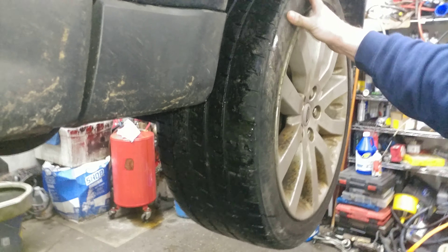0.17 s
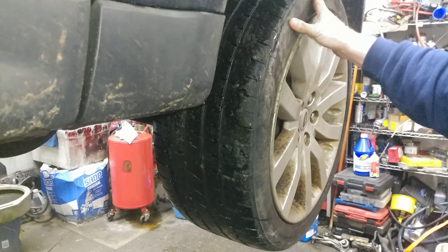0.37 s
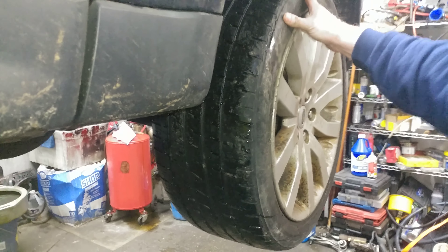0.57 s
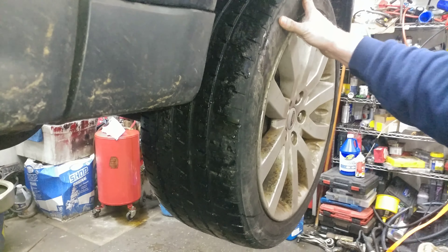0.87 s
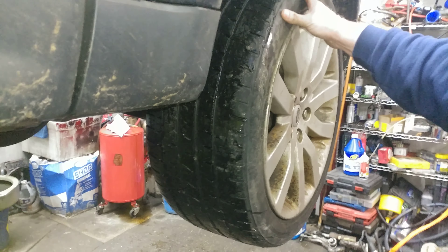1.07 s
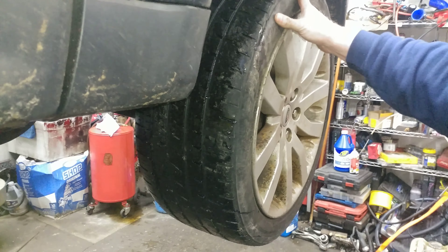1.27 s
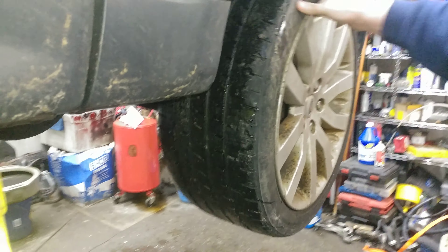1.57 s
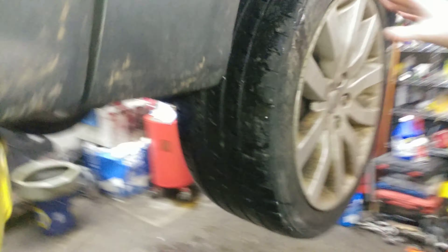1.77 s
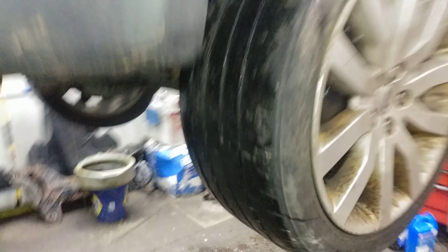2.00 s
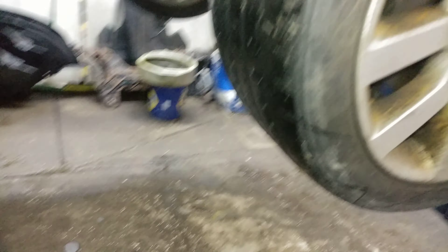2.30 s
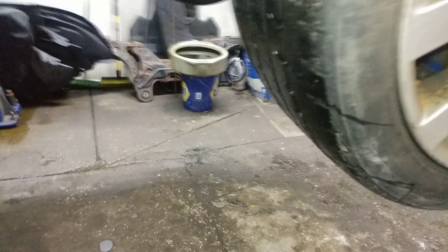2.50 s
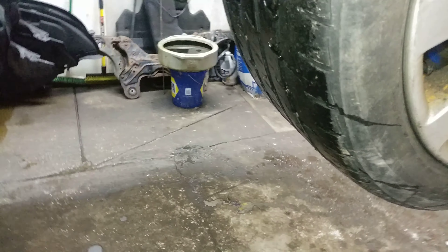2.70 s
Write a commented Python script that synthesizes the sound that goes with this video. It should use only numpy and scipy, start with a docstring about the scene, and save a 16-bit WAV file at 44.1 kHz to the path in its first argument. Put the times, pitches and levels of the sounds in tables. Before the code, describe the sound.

A loose car wheel is rocked by hand four times in a workshop, giving metallic knocks, dull tyre thuds and brief scrapes over a low rumble. Afterwards a few clicks and soft bumps sound close to the microphone.

```python
"""A workshop, with a stereo microphone facing a raised car wheel a little to the right. The wheel is
rocked by hand four times. Each push takes up the play in the hub: light contacts, then a hard knock,
all ringing the same metal. Each pull back thuds through the tyre and scrapes the loose joint, and the
car body rumbles along. Afterwards a few small clicks and bumps sound close to the microphone."""
import sys
import numpy as np
from scipy import signal
from scipy.fft import rfft, irfft, next_fast_len
from scipy.io import wavfile
from scipy.ndimage import uniform_filter1d

SR = 44100
rng = np.random.default_rng(int(sys.argv[2]) if len(sys.argv) > 2 else 0)


def dump_mix(stems):
    """Bounce the given channels to the path in sys.argv[1] as a 16-bit WAV at rate SR."""
    frames = np.atleast_2d(stems).T  # one column per channel
    limited = np.clip(frames, -1, 1)  # hard clip at full scale
    pcm = np.round(limited * 32767).astype(np.int16)
    wavfile.write(sys.argv[1], SR, pcm)


N = 125685

# Blows at the wheel: start_s, gain_db, dull_above_hz
HARD_KNOCKS = [(.1312, 1.5, 6880), (.5517, 0, 5000), (.9787, -0.5, 4460), (1.3954, 1.5, 5020),
               (1.612, -2.5, 2070)]  # at the end of the play
LIGHT_TAPS = [(0.0852, -10, 4000), (0.1017, 0.5, 2500), (0.306, -10, 12200), (.502, -10, 5070),
              (0.519, -8.5, 900), (0.694, -12, 8000), (.717, -5.5, 4000), (0.7334, -1, 1507),
              (.8125, -14.5, 1190), (0.932, -11, 3000), (0.944, -2.5, 1567), (1.123, -21.5, 12000),
              (1.143, -9.5, 3000), (1.345, -10.5, 2000), (1.362, -3.5, 2500), (1.585, -14, 8000),
              (1.602, -5, 8100)]  # as the play is taken up
TYRE_THUDS = [(.314, -1, 1200), (.324, -4, 700), (.336, 1, 400), (.732, -16.5, 1500), (.742, 1.5, 800),
              (.753, -6, 500), (1.162, 3.5, 1500), (1.185, -29.5, 400), (1.612, 0.5, 1200)]  # as the wheel swings back
# Modes of rim and suspension: pitch_hz, knock_db, tap_db, t60_s
HUB_MODES = [(152, -21.5, -32, 0.42), (197.1, -28, -26.5, .3), (233.2, -19, -32.5, .12),
             (323, -13.5, -32, 0.21), (487, -16, -26, .22), (559.8, -26, -17.5, 0.26),
             (622, -8, -14.5, 0.074), (855, -37, -32, .06), (1080, -26, -34, 0.75),
             (1117.6, -24, -19.5, .06), (1262, -21.5, -38.5, .06), (1625, -23.5, -35.5, .25),
             (1679, -17.5, -35.5, 0.12), (1810, -10, -34, .055), (1960, -17, -40, .04),
             (2140, -27, -30.5, 0.18), (3110, -27, -34, .06), (3307, -28, -49, .25)]
# Modes of the tyre and its air cavity: pitch_hz, level_db, t60_s
TYRE_MODES = [(68, -32.5, 1), (124, -24, .4), (186, -26.5, 0.93), (215.4, -15, .2), (366.2, -19, 0.084),
              (491, -21, 0.19), (546.6, -26, 0.45), (637, -35.5, 0.078)]
# Dry slips of the joint, then faint brushes: start_s, length_s, level_db, tilt_db_per_octave, pitch_hz
JOINT_SCRAPES = [(0.354, 0.032, -24, 1.5, 1640), (0.718, 0.0046, -31, -0.5, 2825),
                 (0.805, .012, -40, 9, 12600), (1.148, 0.0075, -21.5, -3, 2970),
                 (1.218, 0.017, -27.5, -2.5, 1700), (1.427, .16, -43, 2.5, 14200),
                 (1.597, 0.016, -17.5, -1.5, 5640), (1.644, 0.027, -25, -1, 768),
                 (1.684, 0.0095, -24, 1.5, 1756), (2.373, 0.0045, -58, 7, 8700),
                 (2.607, 0.022, -59.5, 3.5, 8500), (2.795, .04, -46, 5.5, 8700)]
# Sharp clicks at the microphone: start_s, gain_db, left_over_right_db, top_hz, woody_body_db
CLOSE_CLICKS = [(1.9434, -1, 7, 15240, -54), (2.187, -46, 8, 10000, -55), (2.5748, -5.5, -3, 7850, -40)]
# Soft handling bumps: start_s, gain_db, left_over_right_db, rise_s, pitch_hz
CLOSE_BUMPS = [(2.377, -8.5, -12, 0.0033, 934), (2.4981, 3, 4.5, 0.0003, 496),
               (2.7185, -15, -7, .0005, 339), (2.79, -15, -13.5, 0.0004, 458),
               (2.81, -17, -10.5, 0.015, 204)]
# Rumble of the rocking car body: time_s, level_db
RUMBLE_LEVELS = [(0, -33), (.1, -39), (0.349, -30.5), (1.7, -32.5), (1.83, -35), (1.93, -52),
                 (2.052, -60.5)]

# Tone colours of the noisy parts: frequency_hz, gain_db
KNOCK_CRACK_COLOUR = [(60, -32), (200, -15), (330, 27.5), (420, -15.5), (630, 17), (800, -15), (1150, 23),
                      (1400, -16), (1820, -9), (2400, -16), (3300, 12.5), (3800, -67.5), (6800, -80.5),
                      (8200, -38.5), (10500, -55), (16000, -74)]
KNOCK_RATTLE_COLOUR = [(30, -43.5), (65, -9.5), (250, -2), (500, -2.5), (850, -5), (1800, -5), (2350, -9),
                       (3300, -5), (3800, -26), (5500, -29.5), (7000, -48), (8500, -28.5), (10500, -73.5),
                       (16000, -84)]
TAP_COLOUR = [(60, -1.5), (250, 5.5), (600, 0.5), (850, -9.5), (1200, -2.5), (1800, -7.5), (2400, -11.5),
              (3300, -14.5), (3900, -33.5), (6500, -34.5), (8700, -27.5), (11000, -60), (16000, -47)]
THUMP_COLOUR = [(30, -20), (70, -15), (220, 13.5), (300, -9.5), (600, 2), (800, -2.5), (1150, -7.5),
                (2000, -27.5), (4000, -21.5), (10000, -68.5)]
RASP_COLOUR = [(100, -11.5), (500, 2.5), (1600, -1.5), (2100, -5), (3100, -1.5), (4200, -12.5),
               (5500, -14.5), (7000, -19), (8800, -15), (10800, -54.5), (13000, -35), (16000, -42)]
CLICK_COLOUR = [(100, -33), (600, -3.5), (2500, -10.5), (3700, -1), (5300, -8.5), (7000, -5.5), (8700, 10),
                (11200, -13), (12500, -8), (16000, -8.5)]
WOODY_COLOUR = [(100, -15), (600, 1), (1250, -13.5), (1900, -5), (3000, -17.5), (8000, -23.5),
                (16000, -45.5)]
BUMP_COLOUR = [(40, 10), (150, -1.5), (450, 6), (800, 1), (1200, -14.5), (2500, -27), (5000, -30),
               (7000, -36), (8700, -32.5), (11000, -62), (16000, -43)]
RUMBLE_COLOUR = [(20, -50), (30, -32), (42, 3), (65, -1.5), (130, -0.5), (165, -12.5), (192, 7.5),
                 (230, -17), (500, -20.5), (1500, -26.5), (3200, -38.5), (4500, -52.5), (16000, -60)]
ROOM_TONE_COLOUR = [(20, -31.5), (40, 0), (65, 8.5), (110, -1), (145, -2.5), (270, -18.5), (540, -15),
                    (1500, -27), (2800, -26.5), (6700, -34.5), (9000, -33), (11000, -52.5), (16000, -40)]

# Ring-out of car and workshop: frequency_hz, t60_s
SHOP_DECAY = [(100, 0.75), (260, 0.29), (700, 0.33), (1800, .33), (3200, 0.27), (5000, 0.27), (12000, 0.18)]
# Likeness of left and right for near and far sound: frequency_hz, correlation
NEAR = [(100, .95), (600, 0.71), (1200, 0.34), (2500, -0.032), (8000, -.1)]
FAR = [(60, 0.93), (250, 0.92), (550, 0.35), (1100, 0.37), (2500, -0.11), (8000, -0.1)]

RING_TIME = np.arange(int(0.8 * SR)) / SR  # seconds since a blow


def hub():
    """Every contact rings the same metal, so the knocks are near twins; light contacts sound hollow."""
    out = np.zeros((2, N))
    crack = spread(burst(decay(t60_s=0.024, hold_s=0.008), smooth_bins=24), NEAR)
    rattle = ring_out()
    knock = metal_ring([(hz, db, t60_s) for hz, db, _, t60_s in HUB_MODES])
    knock = knock + at_level(shaped(crack, KNOCK_CRACK_COLOUR), db=-14.5, samples=440)
    knock += at_level(shaped(rattle, KNOCK_RATTLE_COLOUR), db=-19.5, samples=2200)
    tap = metal_ring([(hz, db, t60_s) for hz, _, db, t60_s in HUB_MODES])
    tap = tap + at_level(shaped(crack, TAP_COLOUR), db=-22.5, samples=440)
    tap += at_level(shaped(rattle, TAP_COLOUR), db=-24, samples=2200)
    for sound, contacts in (knock, HARD_KNOCKS), (tap, LIGHT_TAPS):
        for start_s, gain_db, dull_above_hz in contacts:
            add(out, start_s, amp(gain_db) * dulled(sound, dull_above_hz))
    return out


def metal_ring(modes, longest_t60_s=0.3, after_db=-19.5, after_t60_s=0.36):
    """Struck metal rings briefly, with a faint lasting ring of the same modes."""
    brief = ringing([(hz, db, min(t60_s, longest_t60_s)) for hz, db, t60_s in modes])
    lasting = ringing([(hz, db + after_db, after_t60_s) for hz, db, _ in modes])
    return brief + lasting


def tyre():
    """The return blows are cushioned and set the tyre humming."""
    out = np.zeros((2, N))
    hum = ringing(TYRE_MODES)
    for start_s, gain_db, dull_above_hz in TYRE_THUDS:
        noise = spread(burst(decay(t60_s=0.2), smooth_bins=30), NEAR)
        thump = at_level(shaped(noise, THUMP_COLOUR), db=-19, samples=1300)
        add(out, start_s, amp(gain_db) * dulled(hum + thump, dull_above_hz))
    return out


def joint_scrapes(slips_per_s=1500, resonance_db=11.5, relative_width=0.026):
    """Runs of tiny slips rasp, each on its own resonance, and fade in the room."""
    out, t = np.zeros((2, N)), RING_TIME
    for start_s, length_s, level_db, tilt, pitch_hz in JOINT_SCRAPES:
        slips = (rng.random(len(t)) < slips_per_s / SR) * rng.standard_normal(len(t))
        stroke = slips * np.minimum(t / (length_s / 2), 1) * decay(t60_s=0.054, hold_s=length_s)
        direct = spread(burst(decay(t60_s=0.0092), smooth_bins=80), FAR)
        one_slip = direct + amp(-3) * ring_out()
        rasp = signal.fftconvolve(stroke[None], one_slip, axes=1)[:, :len(t)]
        peak_db = lambda f: resonance_db / (1 + ((f / pitch_hz - 1) / relative_width) ** 2)
        slope_db = lambda f: tilt * np.log2((f + 200) / 3000)
        rasp = coloured(rasp, lambda f: amp(along(RASP_COLOUR, f) + peak_db(f) + slope_db(f)))
        add(out, start_s, at_level(rasp, level_db, samples=int((length_s + 0.032) * SR)))
    return out


def close_clicks(base_db=8, room_db=-25):
    """Sharp clicks with a woody body, so near the microphone that they carry little room."""
    out = np.zeros((2, N))
    for start_s, gain_db, pan_db, top_hz, body_db in CLOSE_CLICKS:
        snap = burst(decay(t60_s=0.0052), smooth_bins=200)
        click = spread(snap, likeness=[(500, 0.36), (8000, 0.19)]) + amp(room_db) * ring_out()
        click = coloured(click, lambda f: amp(along(CLICK_COLOUR, f)) / np.sqrt(1 + (f / top_hz) ** 10))
        noise = spread(burst(decay(t60_s=0.035), smooth_bins=60), NEAR)
        body = at_level(shaped(noise, WOODY_COLOUR), body_db, samples=1300)
        add(out, start_s, amp(base_db + gain_db) * (click + body), pan_db)
    return out


def handling_bumps(base_db=-27.5, colour_pitch_hz=480):
    """Soft bumps close to the microphone: one dull colour, shifted to each bump's pitch."""
    out = np.zeros((2, N))
    for start_s, gain_db, pan_db, rise_s, pitch_hz in CLOSE_BUMPS:
        push = np.minimum(RING_TIME / rise_s, 1) * decay(t60_s=0.059, hold_s=rise_s)
        noise = spread(burst(push, smooth_bins=60), likeness=[(150, 0.49), (700, 0.06)])
        bump = coloured(noise, lambda f: amp(along(BUMP_COLOUR, f * colour_pitch_hz / pitch_hz)))
        add(out, start_s, at_level(bump, base_db + gain_db, samples=600), pan_db)
    return out


def car_body():
    """The car body rumbles while it is rocked, then settles."""
    level_db = np.interp(np.arange(N) / SR, *np.transpose(RUMBLE_LEVELS))
    return amp(level_db) * far_noise(RUMBLE_COLOUR)


def ring_out(build_s=0.0096):
    """Dense ringing of car and workshop; each frequency dies at its own speed."""
    t = RING_TIME
    hz, time_s, bands = signal.stft(burst(np.ones(len(t)), smooth_bins=8), SR, nperseg=256)
    fade = amp(-60 * time_s / along(SHOP_DECAY, hz)[:, None])
    _, tail = signal.istft(bands * fade, SR, nperseg=256)
    tail = spread(tail[:, :len(t)], FAR) * (1 - np.exp(-t / build_s))
    return tail / np.linalg.norm(tail[0])


def room_tone(level_db=-49.5):
    """The steady low hush of the quiet workshop."""
    return amp(level_db) * far_noise(ROOM_TONE_COLOUR)


def far_noise(colour):
    """Steady, wide noise at unit rms."""
    noise = spread(rng.standard_normal((2, N + 4096)), FAR)
    return at_level(shaped(noise, colour)[:, -N:], db=0, samples=N)


def ringing(modes, contact_s=0.0003):
    """Damped sines of a struck body, rising over the time of contact."""
    ring = sum((-1) ** k * amp(db) * decay(t60_s) * np.sin(2 * np.pi * hz * RING_TIME)
               for k, (hz, db, t60_s) in enumerate(modes))
    return ring * (1 - np.exp(-(RING_TIME / contact_s) ** 2))


def burst(envelope, smooth_bins):
    """Two noise bursts with an even spectrum and about unit energy."""
    x = rng.standard_normal((2, len(envelope))) * envelope
    for _ in range(2):
        spectrum = rfft(x)
        power = np.abs(uniform_filter1d(np.abs(spectrum) ** 2, smooth_bins))
        x = irfft(spectrum / np.sqrt(power + 1e-12), len(envelope))
        x *= np.minimum(1, 10 * envelope)  # keeps the tail quiet
    return x


def decay(t60_s, hold_s=0):
    """An envelope that holds, then falls 60 dB in t60_s."""
    return amp(-60 * np.maximum(RING_TIME - hold_s, 0) / t60_s)


def amp(db):
    """Decibels to amplitude."""
    return 10 ** (np.asarray(db) / 20)


def at_level(x, db, samples):
    """Scale x so that its opening samples have this rms level."""
    return amp(db) * x / np.sqrt(np.mean(x[..., :samples] ** 2))


def along(points, hz):
    """Read a curve of (frequency_hz, value) points on a log axis."""
    point_hz, values = np.transpose(points)
    return np.interp(np.log(hz + 1), np.log(point_hz + 1), values)


def coloured(x, gain):
    """Causal, minimum-phase filter with the given gain at each frequency."""
    size = 2 * next_fast_len(x.shape[-1] // 2 + 4096)
    log_gain = np.log(np.maximum(gain(np.fft.rfftfreq(size, 1 / SR)), 1e-6))
    cepstrum = irfft(log_gain, size)
    cepstrum[1:size // 2] *= 2
    cepstrum[size // 2 + 1:] = 0
    return irfft(rfft(x, size) * np.exp(rfft(cepstrum)), size)[..., :x.shape[-1]]


def shaped(x, colour):
    """Filter x by a colour table."""
    return coloured(x, lambda f: amp(along(colour, f)))


def dulled(x, above_hz):
    """A softer contact loses its treble."""
    return coloured(x, lambda f: 1 / np.sqrt(1 + (f / above_hz) ** 2))


def spread(pair, likeness):
    """Two unrelated signals become a partly alike left and right."""
    size = pair.shape[-1]
    correlation = np.clip(along(likeness, np.fft.rfftfreq(size, 1 / SR)), -0.99, 0.99)
    angle = np.arccos(correlation) / 2
    mid, side = irfft(rfft(pair) * [np.cos(angle), np.sin(angle)], size)
    return np.array([mid + side, mid - side])


def from_right(x, left_lag_s=0.00007):
    """The wheel stands to the right, so its sound reaches the left capsule a little later."""
    size = next_fast_len(N + SR // 2)
    half_phase = np.pi * left_lag_s * np.fft.rfftfreq(size, 1 / SR)
    return irfft(rfft(x, size) * np.exp([-1j * half_phase, 1j * half_phase]), size)[:, :N]


def add(out, start_s, x, pan_db=0):
    """Mix a sound in at start_s; positive pan_db leans left."""
    start = int(round(start_s * SR))
    panned = x * amp([[pan_db / 2], [-pan_db / 2]])
    out[:, start:start + x.shape[-1]] += panned[:, :N - start]


def scene():
    """The rocked wheel, small noises at the microphone, and car and workshop behind."""
    wheel = from_right(hub() + tyre()) + joint_scrapes()
    return wheel + close_clicks() + handling_bumps() + car_body() + room_tone()


def record(dry, low_cut_hz=33, top_hz=16300):
    """The recorder drops the deepest bass, rounds off the highest peaks and cuts the top treble."""
    lean = signal.sosfilt(signal.butter(4, low_cut_hz, "high", fs=SR, output="sos"), dry)
    rounded = lean / (1 + np.abs(lean) ** 6) ** (1 / 6)
    size = next_fast_len(N + SR // 2)
    in_band = np.fft.rfftfreq(size, 1 / SR) < top_hz
    return irfft(rfft(rounded, size) * in_band, size)[:, :N]


dry = scene()
out = record(dry)
dump_mix(out)
```